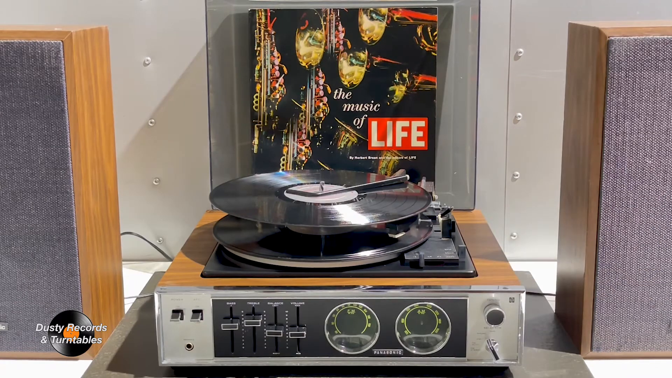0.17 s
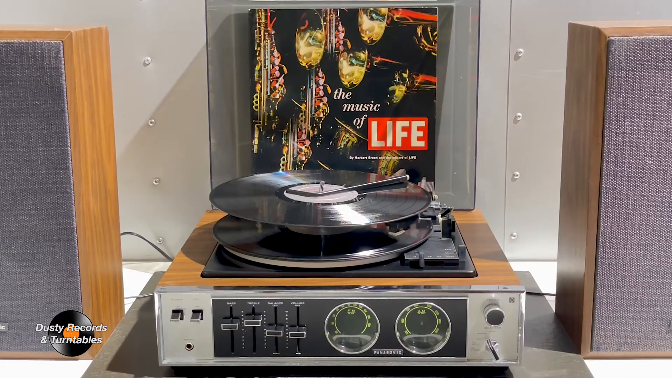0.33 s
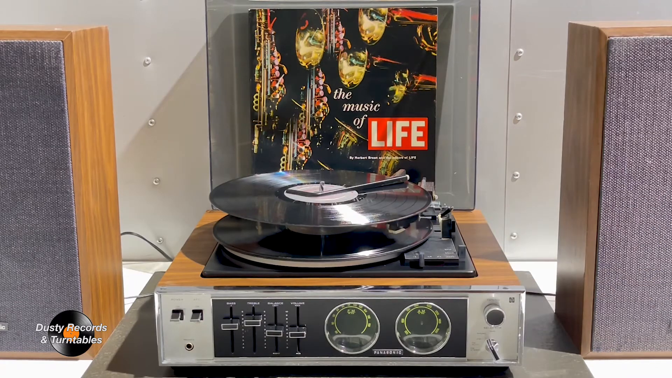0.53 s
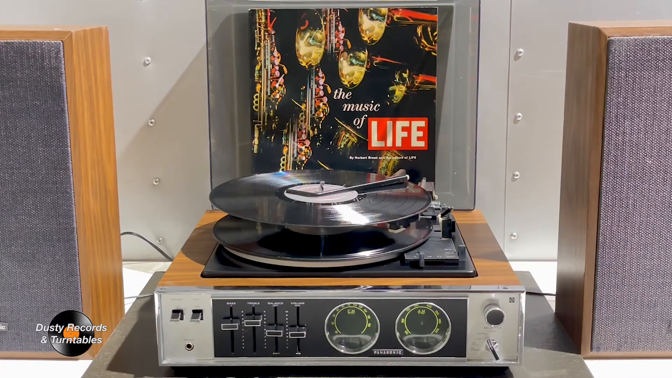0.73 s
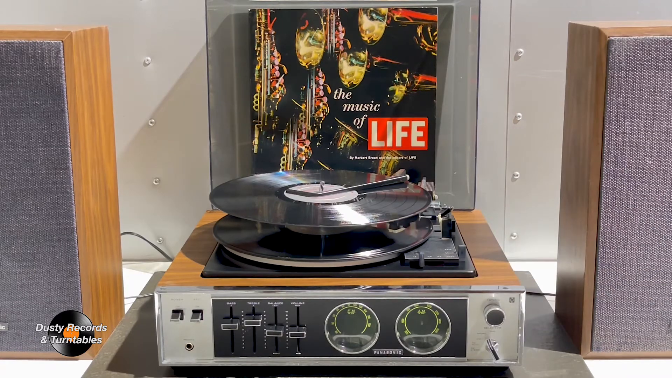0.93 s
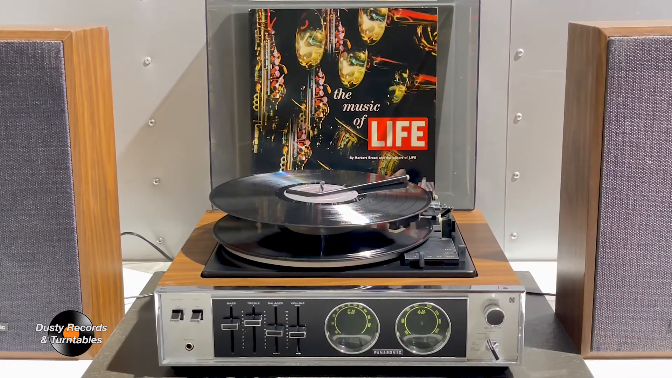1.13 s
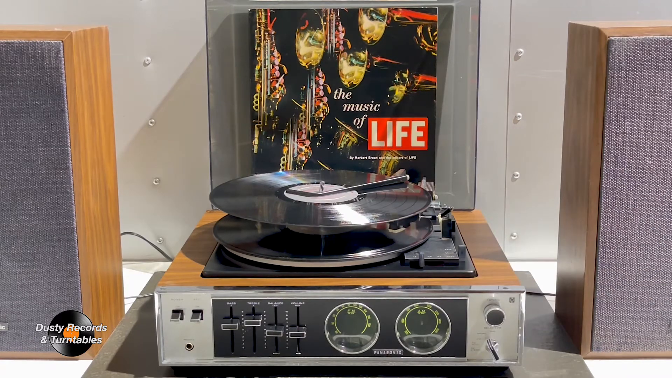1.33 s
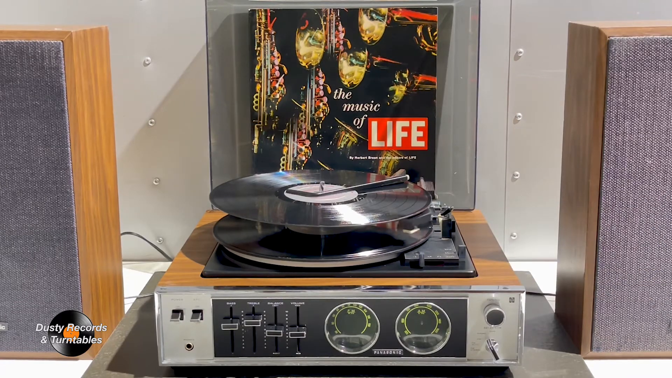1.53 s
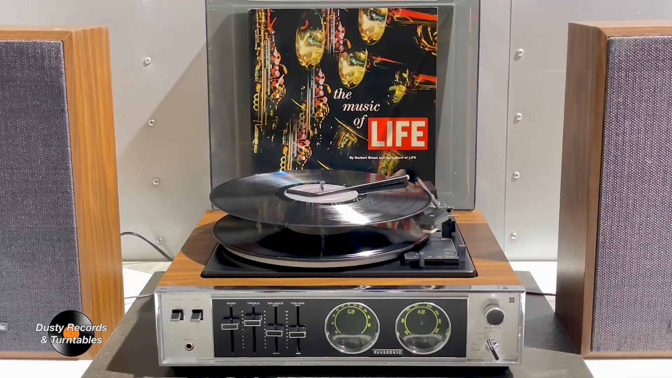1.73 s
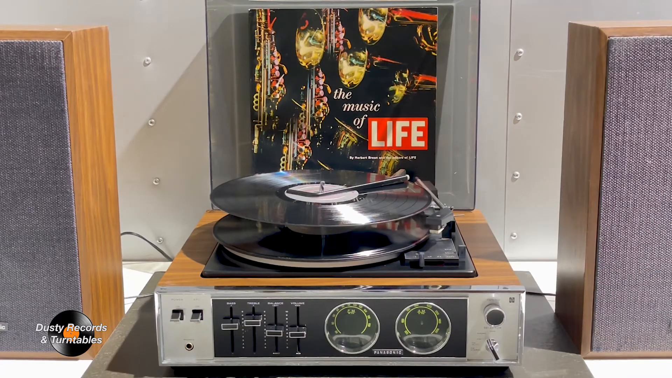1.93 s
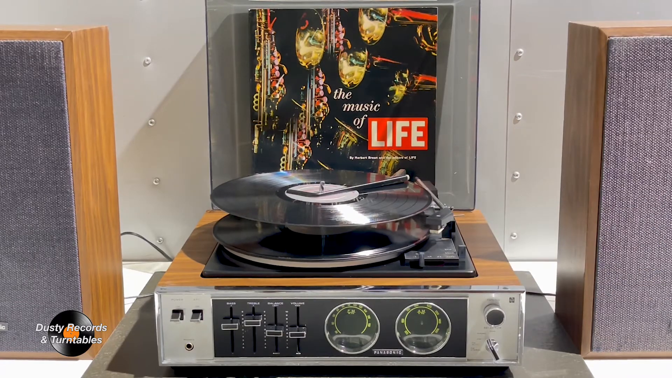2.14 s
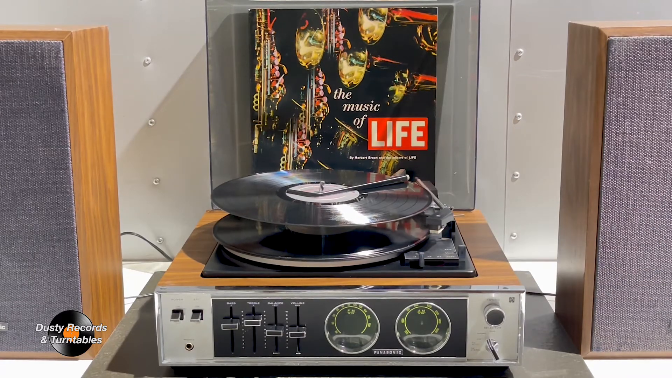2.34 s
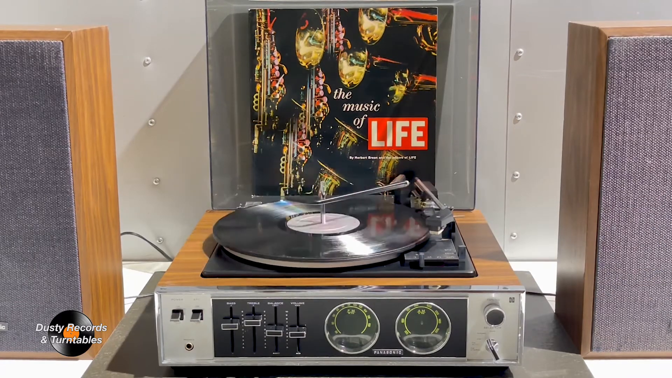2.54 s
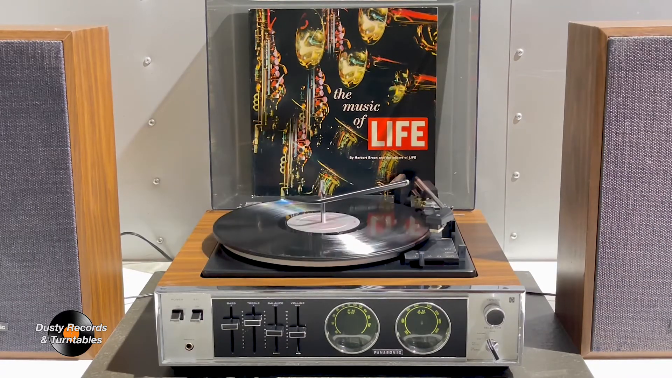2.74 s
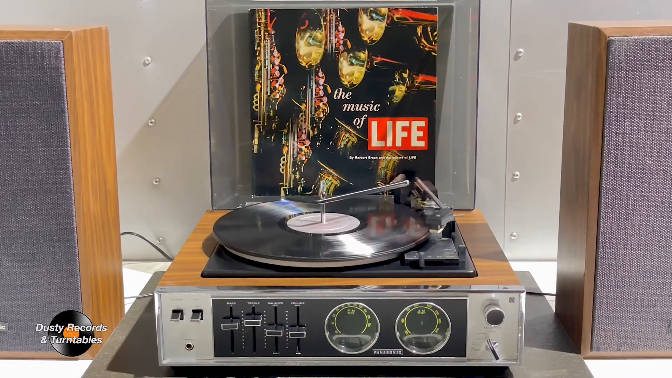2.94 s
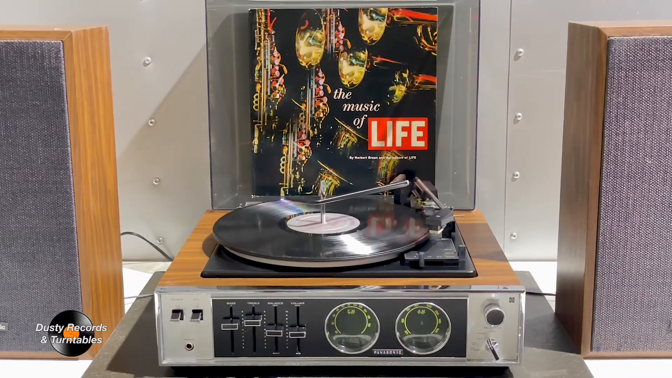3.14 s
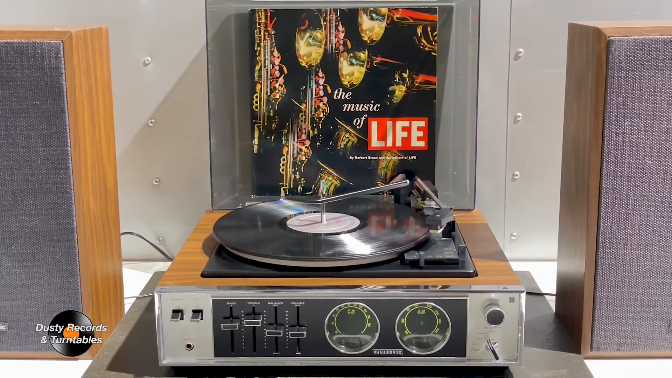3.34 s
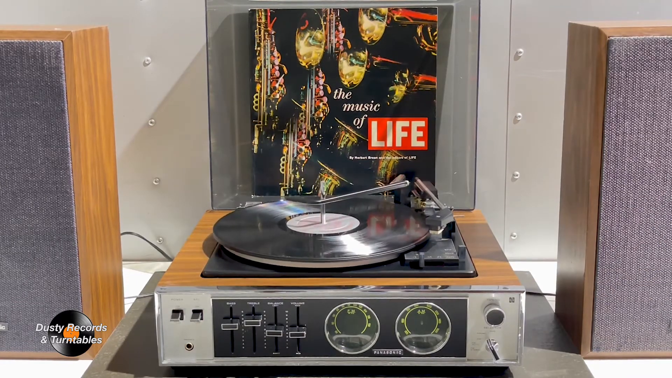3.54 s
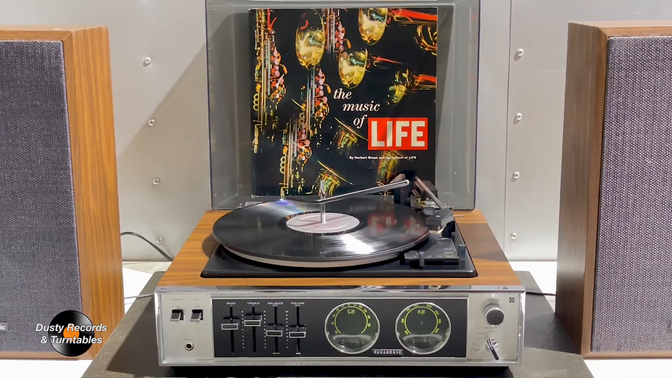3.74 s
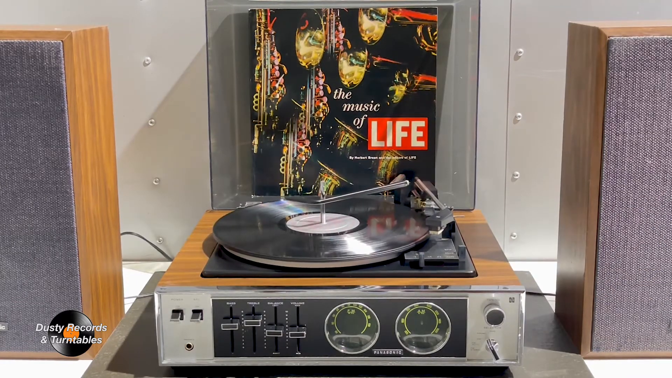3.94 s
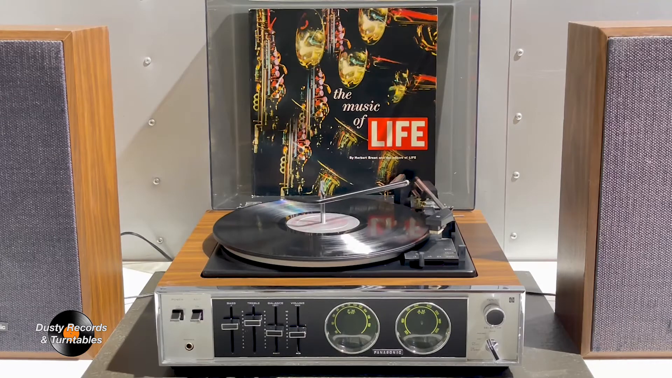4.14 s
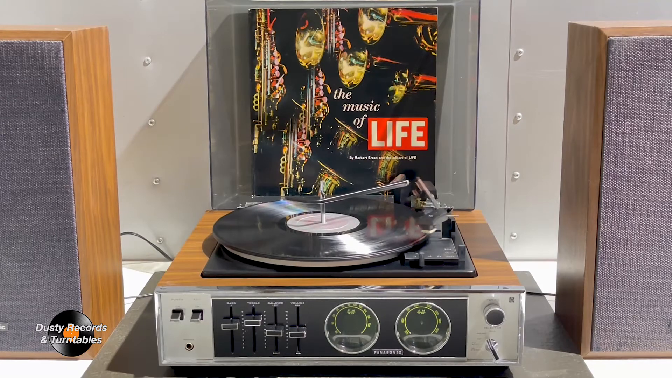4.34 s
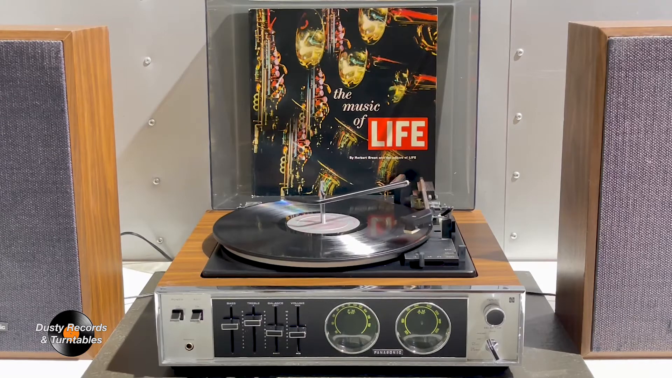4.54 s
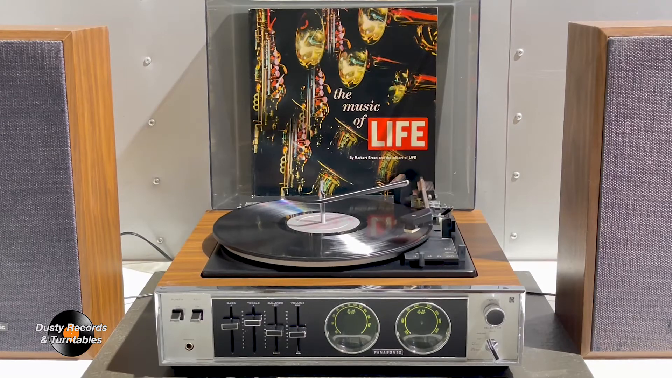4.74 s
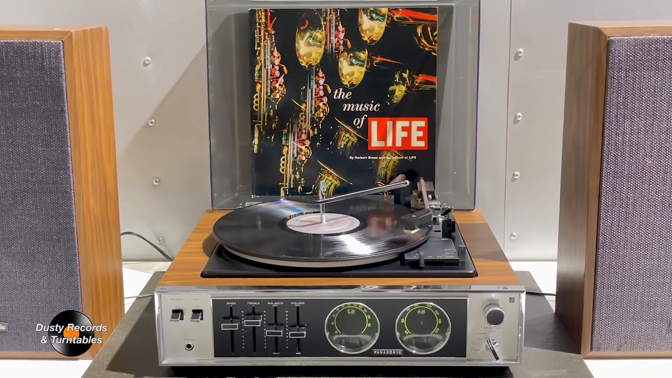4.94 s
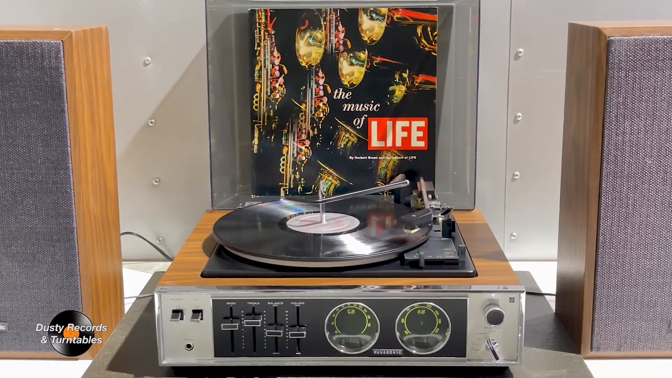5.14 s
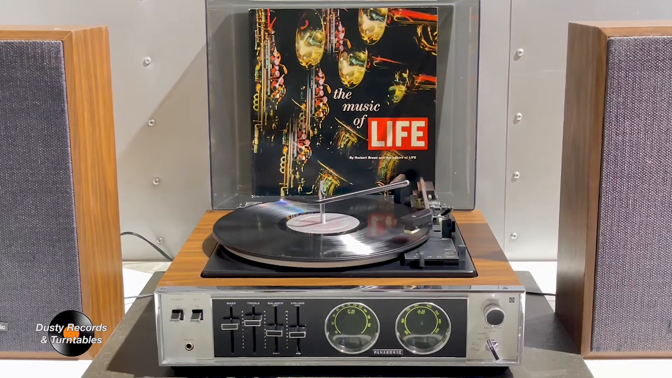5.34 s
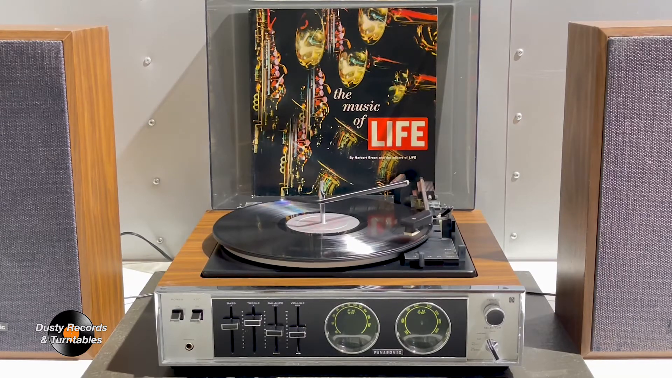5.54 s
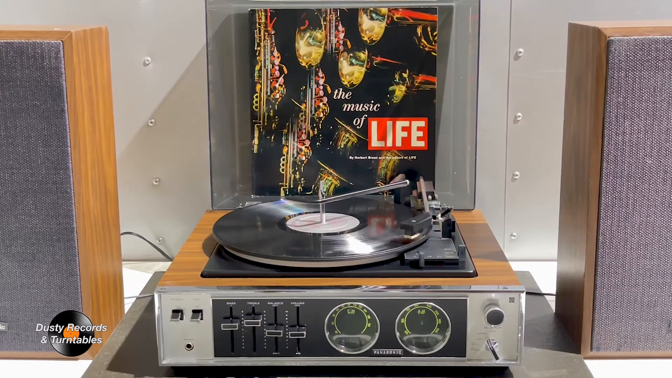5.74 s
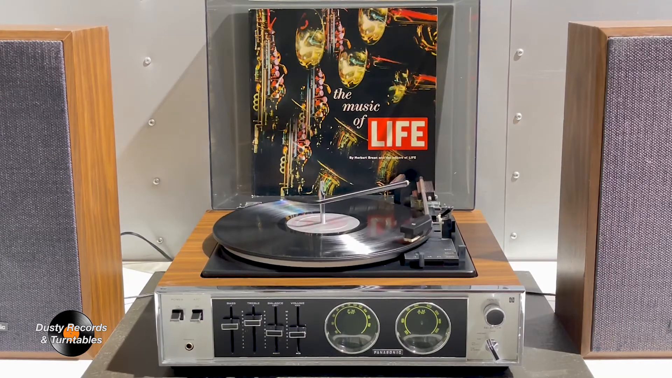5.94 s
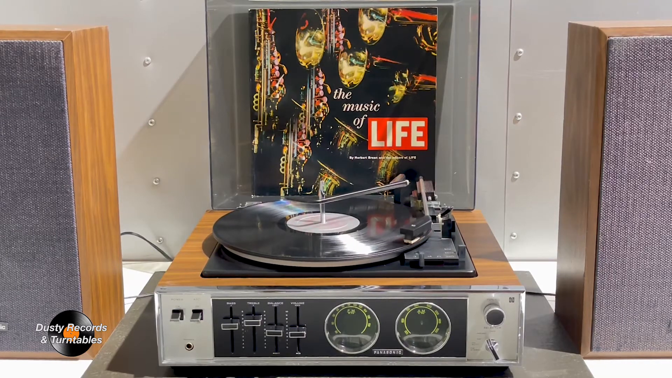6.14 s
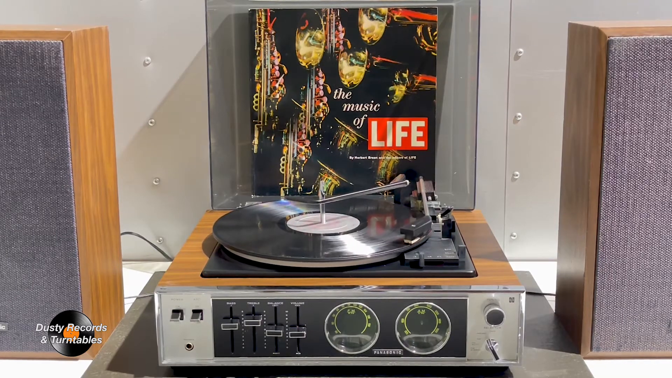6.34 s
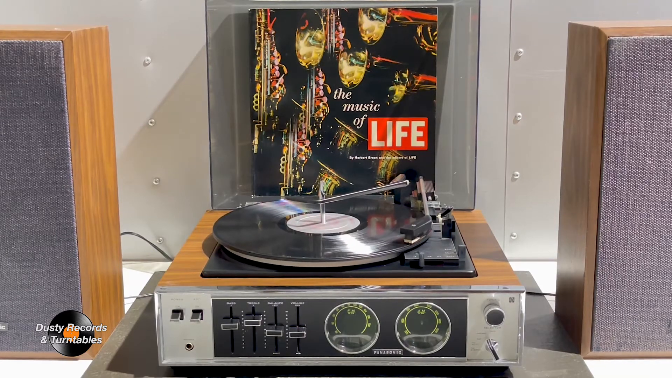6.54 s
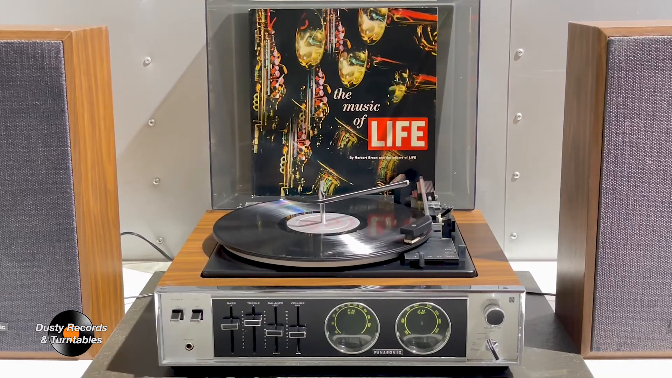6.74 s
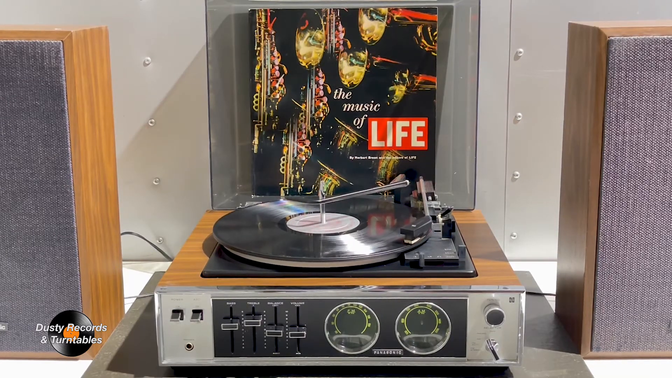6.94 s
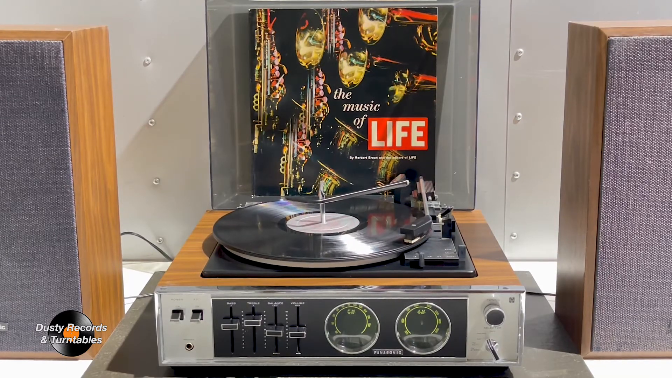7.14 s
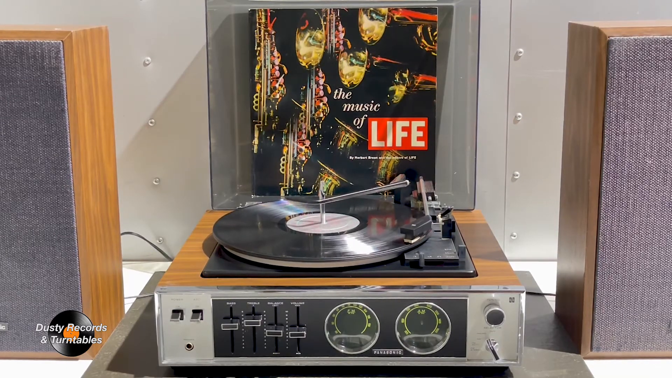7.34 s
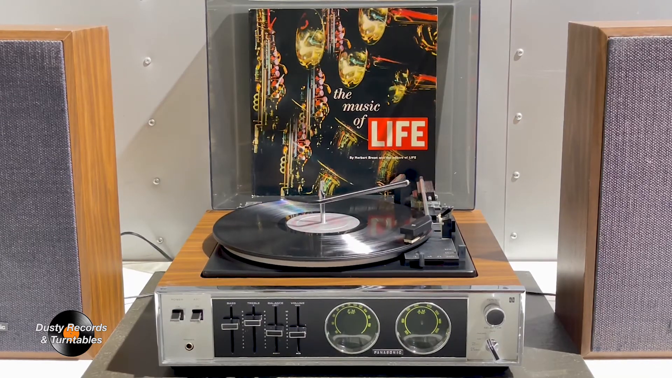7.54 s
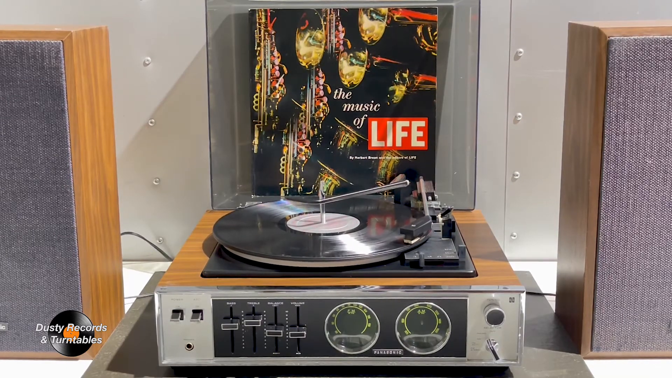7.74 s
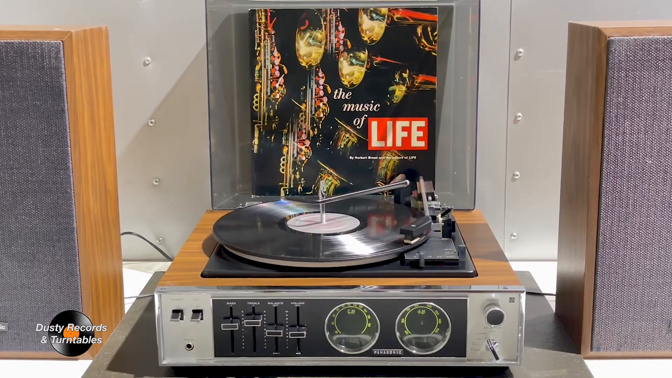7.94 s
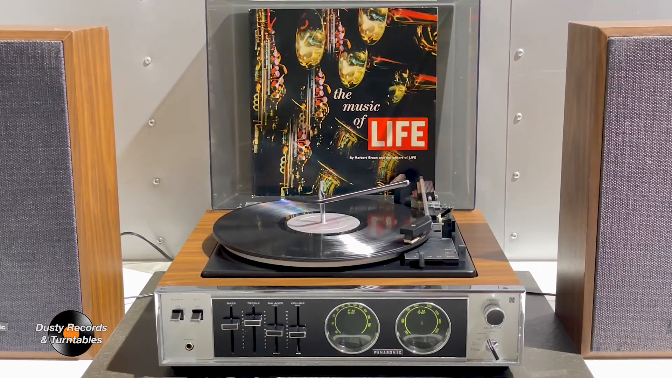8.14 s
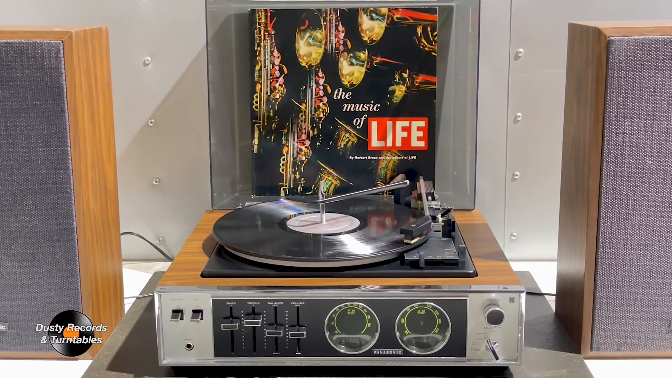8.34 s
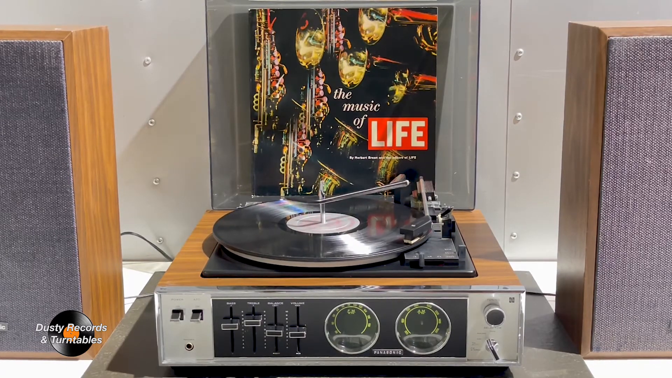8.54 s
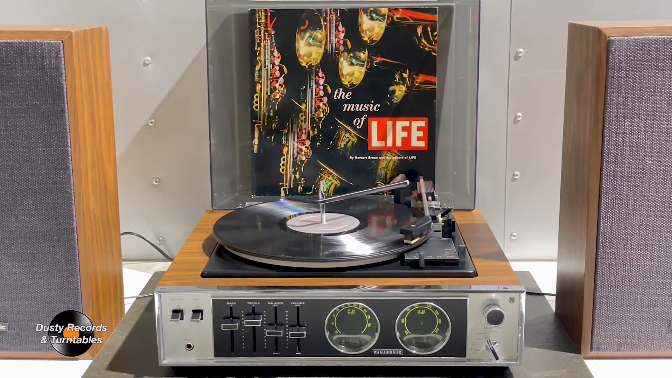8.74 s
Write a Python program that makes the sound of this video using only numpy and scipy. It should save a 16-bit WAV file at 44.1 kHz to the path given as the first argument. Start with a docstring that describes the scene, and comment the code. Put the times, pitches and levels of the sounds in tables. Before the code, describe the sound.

In a small hard room, an automatic turntable hums softly under low room tone. A faint squeak comes early, then a dense clatter of steel and wood as the disc drops at 2.5 seconds. Sparse ticks and knocks follow while the arm moves. At six seconds the stylus lands, and loudspeakers give crackle, thin hiss, rumble, pops and one big thud. Close stereo microphone, no music.

```python
"""Record changer in a small hard room

Cams and levers tick, a disc drops down the spindle and the arm swings in: noise bursts excite steel and wood modes.
Once the stylus lands, the loudspeakers play hiss, rumble and scrape of shaped noise, with crackle, pops and thuds.
A motor hum of wavering sines, the room's hush with a low draught, and a faint early squeak lie around them.
Levels in the tables are set at the source, before the room and the microphone."""
import sys
import numpy as np
from scipy import signal
from scipy.fft import rfft, irfft
from scipy.io import wavfile
from scipy.ndimage import uniform_filter1d

SR = 44100
rng = np.random.default_rng(int(sys.argv[2]) if len(sys.argv) > 2 else 0)


def volts_from_decibels(level):
    """Turn decibel levels (scalar or array-like) into linear amplitude factors."""
    exponent = np.asarray(level, float) / 20
    return 10 ** exponent


def master_out(mix):
    """Clip the mix to full scale and print it as 16-bit PCM to the path in sys.argv[1]."""
    frames = np.transpose(np.atleast_2d(mix))
    ceiling = np.clip(frames, -1, 1)
    pcm = np.round(ceiling * 32767).astype(np.int16)
    wavfile.write(sys.argv[1], SR, pcm)


N = 392490  # samples, 8.9 s
T = np.arange(N) / SR


def along(table, hz):
    """Read a (f/Hz, value) table on a log-frequency axis."""
    f, v = np.transpose(table)
    return np.interp(np.log(hz + 1), np.log(f), v)


def colour(x, table):
    """Shape by a (f/Hz, level/dB) spectrum."""
    n = x.shape[-1]
    gain = volts_from_decibels(along(table, np.fft.rfftfreq(n, 1 / SR)))
    return irfft(rfft(x) * gain, n)


def unit(x):
    """Scale to rms 1."""
    return x / np.sqrt(np.mean(x ** 2))


def peak(x):
    """Scale to peak 1."""
    return x / np.abs(x).max()


def band(x, lo_hz, hi_hz):
    """Band-pass."""
    return signal.sosfilt(signal.butter(2, [lo_hz, hi_hz], "bandpass", fs=SR, output="sos"), x)


def walk(rate):
    """Smooth random drift with rms 1, drawing a new value `rate` times a second."""
    k = int(SR / rate)
    steps = np.repeat(rng.standard_normal(N // k + 1), k)
    return unit(uniform_filter1d(uniform_filter1d(steps, k), k)[:N])


def add(track, s, sound):
    """Mix a sound in at a time in seconds."""
    i = int(s * SR)
    track[i:i + len(sound)] += sound[:N - i]


# stereo spread of the hush, nearly mono in the bass: (f/Hz, side gain over mid/dB)
HUSH_SPREAD = [(60, -21), (110, -7.5), (200, -9), (380, -7.5), (700, -1), (1290, -2), (2380, -13.5),
               (4400, -4.5), (8120, -17), (15000, 5)]


def stereo(table):
    """Noise of a given colour whose left and right agree most in the bass; its mid has rms 1."""
    mid, side = colour(rng.standard_normal((2, N)), table)
    return (mid + colour(side, HUSH_SPREAD) * np.array([[1], [-1]])) / np.std(mid)


# relative spectrum of the room tone: (f/Hz, level/dB per Hz)
HUSH_COLOUR = [(25, -14), (50, 3.5), (99, 3.5), (160, -0.5), (250, -4.5), (400, -10), (630, -17.5),
               (1000, -22), (1600, -32.5), (2500, -36), (4000, -43.5), (6300, -43), (8000, -40),
               (11500, -49), (13500, -72)]
# relative spectrum of the low draught: (f/Hz, level/dB per Hz)
DRAUGHT_COLOUR = [(20, -46.5), (40, 13), (60, 8), (85, 9), (110, -40)]
# swell of the draught: (t/s, level/dB)
DRAUGHT_SWELL = [(0, -58), (.35, -55.5), (1.2, -58.5), (1.5, -63), (1.96, -62), (2.33, -64), (2.62, -40.5),
                 (2.9, -57.5), (3.7, -64), (4.2, -64.5), (5.2, -66), (5.6, -54), (6.4, -72.5), (7, -65),
                 (7.35, -55.5), (8.9, -57.5)]
HUSH_DB = -56


def hush():
    """Room tone of steady coloured noise; a draught in the lowest octaves swells and fades."""
    swell = volts_from_decibels(np.interp(T, *np.transpose(DRAUGHT_SWELL)))
    draught = unit(colour(rng.standard_normal(N), DRAUGHT_COLOUR)) * swell
    return volts_from_decibels(HUSH_DB) * stereo(HUSH_COLOUR) + draught


# motor lines, about which the strength wavers: (f/Hz, level/dB rms)
MOTOR_LINES = [(59.2, -50.5), (118.4, -62.5), (177.6, -65), (419.9, -76.5)]


def hum():
    """Motor lines that waver in strength and phase; the cartridge picks up more of the second in the groove."""
    lift_db = 9 * np.clip((T - 6.1) / 1.5, 0, 1)
    out = np.zeros(N)
    for k, (hz, db) in enumerate(MOTOR_LINES):
        level = volts_from_decibels(db + 2.2 * walk(4.2) + lift_db * (k == 1))
        turns = hz * T + 0.017 * walk(12.0)
        out += level * np.sqrt(2) * np.sin(2 * np.pi * turns)
    return out


# reverberation time: (f/Hz, t60/s)
ROOM_T60 = [(100, 0.95), (400, 0.34), (1000, 0.71), (2500, 0.71), (5000, 0.64), (10000, 0.38)]
# spectrum of the room's tail: (f/Hz, level/dB)
TAIL_COLOUR = [(100, -2.5), (400, -2.5), (1200, -5.5), (2600, -6.5), (6000, -6), (11000, 1.5)]


def room(x, db):
    """Direct sound plus a diffuse tail of noise bands that fade at their own rates, partly shared by both sides."""
    t = np.arange(SR)[:, None] / SR
    hz = 70 * 2 ** np.arange(0, 7.5, .5)
    falls = (1000. ** (-t / along(ROOM_T60, hz))).T
    tail = np.zeros((2, SR))
    for f, fall in zip(hz, falls):
        tail += fall * band(rng.standard_normal((2, SR)), f / 2 ** .25, f * 2 ** .25)
    tail *= 1 - np.exp(-t.T / 0.0007)  # builds up over about a millisecond
    mid, side = colour(tail / np.sqrt(np.sum(tail[0] ** 2)), TAIL_COLOUR)
    side = 0.56 * band(side, 180, 11000)
    wet = np.array([mid + side, mid - side])
    return x + volts_from_decibels(db) * signal.fftconvolve(x[None], wet, axes=1)[:, :N]


# two faint squeaks, each a path of (t/s, f/Hz, level/dB rms)
SQUEAK_PATHS = [
    [(0.14, 8500, -85), (0.215, 8500, -79), (0.246, 7800, -84), (0.278, 8600, -77), (0.36, 8200, -75),
     (0.39, 8700, -82)],
    [(0.42, 7780, -80), (0.45, 8600, -79), (0.5, 8250, -76), (0.53, 7600, -95)],
]


def squeak():
    """A thin, rough tone: a sine whose pitch and strength wander about a drawn path."""
    out = np.zeros(N)
    for path in SQUEAK_PATHS:
        s, hz, db = np.transpose(path)
        turns = np.cumsum(np.interp(T, s, hz) + 90 * walk(150)) / SR
        level = volts_from_decibels(np.interp(T, s, db, left=-140, right=-140) + 1 * walk(60))
        out += level * np.sqrt(2) * np.sin(2 * np.pi * turns)
    return out


def ring(modes, size):
    """Response of (f/Hz, level/dB, t60/s) modes to one tap: sines dying exponentially."""
    t = np.arange(size) / SR
    return sum(volts_from_decibels(db) * np.sin(2 * np.pi * hz * t) * 1000. ** (-t / t60) for hz, db, t60 in modes)


def rattle(lo_hz, hi_hz, db, t60):
    """Loose parts answer a tap with too many modes to tell apart, and differently each time."""
    fall = 1000. ** (-np.arange(8192) / SR / t60)
    return volts_from_decibels(db) * unit(band(rng.standard_normal(8192), lo_hz, hi_hz)) * fall


def contact(ms):
    """Force of a short rattling contact: a quick rise, then an exponential fall with time constant ms."""
    t = np.arange(4096) / SR
    return (1 - np.exp(-t / 0.00045)) * np.exp(-t * 1000 / max(ms, 1))


def blow(ms, ringing, dbs, bands):
    """A burst of rattle heard through ringing modes and plain bands, each part at its own peak level."""
    burst = np.pad(rng.standard_normal(4096) * contact(ms), (0, 4096))
    burst[8] += 9  # the first touch is the hardest
    heard = [signal.fftconvolve(burst, response)[:8192] for response in ringing]
    heard += [band(band(burst, *edges), *edges) for edges in bands]
    return sum(volts_from_decibels(db) * peak(part) for db, part in zip(dbs, heard))


# steel chassis modes: (f/Hz, relative level/dB, t60/s)
STEEL_MODES = [(2390, -6, .02), (2520, 5, .022), (3200, 7, .018), (3400, 0, .03), (3870, -4, .02)]
# wooden plinth modes: (f/Hz, relative level/dB, t60/s)
WOOD_MODES = [(131, 3, 0.11), (216, -8, 0.116), (235.4, -3.5, 0.073), (329, 6.5, 0.066), (376, 4.5, .1),
              (472, -19, 0.12), (596, -5, 0.037)]
# loose parts: (low f/Hz, high f/Hz, level/dB against the modes, t60/s)
STEEL_RATTLE, WOOD_RATTLE = (2180, 3350, 7.1, 0.022), (155, 620, 7.1, 0.058)
# levers striking steel, peak levels: (t/s, steel ring level/dB, plinth level/dB, plate level/dB, edge level/dB)
LEVER_KNOCKS = [(1.847, -38, -30, -51, -40), (2.5253, -25.5, -25.5, -25.5, -18),
                (2.555, -31.5, -42, -35, -53), (2.578, -50, -35, -49, -56), (2.699, -46, -35, -46, -67),
                (2.859, -40, -38, -33.5, -50.5), (2.983, -50, -48.5, -39, -68.5),
                (4.49, -36, -22, -33, -47), (4.519, -41, -36, -43, -68), (4.594, -45.5, -38, -33.5, -79),
                (5.482, -52, -55, -45, -49), (5.517, -56, -55, -45.5, -60), (5.8, -42.5, -72, -49.5, -59),
                (5.961, -63, -48, -52, -75.5), (6.023, -55, -68, -51, -69)]
LEVER_CONTACT_MS = 4.5


def levers():
    """Levers ring steel and wood, with a plate band in the low mids and a bright edge on top."""
    out = np.zeros(N)
    steel, wood = ring(STEEL_MODES, size=8192), ring(WOOD_MODES, size=8192)
    for s, *dbs in LEVER_KNOCKS:
        ringing = (steel + rattle(*STEEL_RATTLE), wood + rattle(*WOOD_RATTLE))
        add(out, s, blow(LEVER_CONTACT_MS, ringing, dbs, [(380, 1170), (3600, 10200)]))
    return out


# damped slaps of the falling disc and the arm rest, peak levels:
# (t/s, clatter level/dB, plinth level/dB, plate level/dB, edge level/dB, contact time constant/ms)
DISC_AND_ARM_SLAPS = [(2.447, -47, -51, -45, -49, 11), (2.454, -35, -28, -40.5, -32.5, 18),
                      (2.467, -40.5, -30, -34.5, -57, 33), (2.487, -20.5, -28.5, -21.5, -20.5, 13.6),
                      (2.496, -26, -22.5, -20, -21, 14), (2.505, -25, -19, -31, -20, 3.8),
                      (5.502, -38, -45.5, -42.5, -34.5, 6.8), (5.673, -33, -38.5, -32.5, -20, 14),
                      (5.684, -30, -35, -42, -34, 10)]


def slaps():
    """Disc and arm rest excite only the upper wood modes, under bands of plate, clatter and edge."""
    out = np.zeros(N)
    rim = ring(WOOD_MODES[1:], size=8192)
    for s, clatter, plinth, plate, edge, ms in DISC_AND_ARM_SLAPS:
        dbs = (plinth, plate, clatter, edge)
        bands = [(400, 1640), (1600, 5500), (6000, 15300)]
        add(out, s, blow(ms, (rim + rattle(*WOOD_RATTLE),), dbs, bands))
    return out


# relative spectrum of a cam tick: (f/Hz, level/dB per Hz)
TICK_COLOUR = [(410, -54), (700, -8.5), (1430, 2), (1550, 10), (1910, -0.5), (2460, 0), (2920, -9),
               (3700, -1), (4850, -21), (5570, -21), (11000, -38), (14300, -84), (22000, -120)]
# a cam follower: (t/s, noise rms level before the contact envelope/dB, contact time constant/ms)
CAM_TICKS = [(3.6106, -37.5, 5.6), (4.2692, -41.5, 6.5), (5.2013, -40.5, 6.9)]


def cam_ticks():
    """The cam follower rings nothing: a short burst of coloured noise under a contact envelope."""
    out = np.zeros(N)
    for s, db, ms in CAM_TICKS:
        noise = unit(colour(rng.standard_normal(4096), TICK_COLOUR))
        add(out, s, volts_from_decibels(db) * noise * contact(ms))
    return out


# loudspeaker cone and box: (f/Hz, relative level/dB, t60/s)
CONE_AND_BOX = [(65, 3, 0.2), (113.6, 12, 0.21), (134.5, 11.5, 0.31), (190, -33, 0.13)]
BOX_HZ, BOX_WIDTH_HZ = 106.3, 31  # the box holds back the tones near its own


def pop_parts():
    """Four ranges of the loudspeaker's answer to a step: the lower a part, the later it leaves."""
    hz = np.fft.rfftfreq(16384, 1 / SR) + 1
    glide = 1.197 * np.log((hz + 20) / (hz + 3000)) + hz * 0.000464
    box_lag = np.arctan((hz - BOX_HZ) / BOX_WIDTH_HZ) / np.pi - .5
    sweep = -np.exp(-2j * np.pi * (glide + box_lag))
    parts = []
    for centre_hz, octaves in [(2800, .55), (118, 1.1), (480, 1.15), (6300, .75)]:
        bell = np.exp(-np.log2(hz / centre_hz) ** 2 / octaves ** 2)
        parts.append(peak(irfft(sweep * bell)))
    bite, thump, knock, tick = parts
    box = ring(CONE_AND_BOX, size=16384) * (1 - np.exp(-np.arange(16384) / SR / 0.01))
    return bite, thump + volts_from_decibels(-16.0) * peak(box), knock, tick


# dust and scratches under the stylus:
# (t/s, bite 2-4 kHz level/dB, knock 300-1300 Hz level/dB, tick 5-10 kHz level/dB)
DUST_POPS = [(6.0786, -45, -34.5, -50), (6.0998, -27, -21.5, -61), (6.1174, -33, -42, -57),
             (6.1368, -37, -60, -46), (6.16, -41, -49, -43), (6.1706, -39, -45, -55),
             (6.1958, -38, -41, -31), (6.2279, -45, -43, -57), (6.2621, -35, -39, -43.5),
             (6.3306, -35, -47, -53), (6.337, -34, -48, -44), (6.3547, -37, -44, -38),
             (6.4007, -37.5, -50, -54), (6.4117, -38.5, -38, -37.5), (6.4816, -47, -45, -52),
             (6.523, -41, -44, -61), (6.6877, -33, -42.5, -44), (6.803, -35, -48, -60),
             (7.0626, -17.5, -26, -19), (7.1123, -36, -43, -62), (7.1754, -39, -50, -62),
             (7.2121, -30, -9.5, -44), (7.4498, -29, -40.5, -26.5), (7.7418, -41.5, -58, -41),
             (8.0923, -20.5, -32.5, -18.5), (8.3157, -48.5, -38, -49), (8.4035, -49, -60, -41),
             (8.423, -51, -61, -35.5), (8.4434, -64, -57, -46), (8.4598, -27.5, -42, -25.5),
             (8.466, -36, -55, -35), (8.5444, -39, -52, -31.5), (8.6215, -40.5, -55, -38.5),
             (8.8346, -34.5, -60, -33)]
# jolts that throw the cone: (t/s, level/dB, pitch ratio)
CONE_THUDS = [(6.0996, -27, 0.63), (6.4092, -35, 0.85), (6.6869, -37.5, 1.94), (7.2116, -10.5, 0.89)]
LANDS_S = 6.066  # the stylus meets the record
CRACKLE_PER_S, CRACKLE_DB, CRACKLE_THINS_S = 50, -44, .3  # small pops, densest on the dusty rim


def pops():
    """Single pops and thuds, and a random crackle that thins out after the landing."""
    out = np.zeros(N)
    bite, thump, knock, tick = pop_parts()
    for s, *dbs in DUST_POPS:
        add(out, s, sum(volts_from_decibels(db) * part for db, part in zip(dbs, (bite, knock, tick))))
    for s, db, ratio in CONE_THUDS:
        repitched = np.interp(np.arange(8192) * ratio, np.arange(len(thump)), thump)
        add(out, s, volts_from_decibels(db) * repitched)
    when, size = rng.random(N), volts_from_decibels(CRACKLE_DB + 2.5 * rng.standard_normal(N))
    rate = CRACKLE_PER_S * np.exp(-np.maximum(T - LANDS_S, 0) / CRACKLE_THINS_S) * (T > LANDS_S)
    small_pop = bite + volts_from_decibels(-12) * knock + volts_from_decibels(-22) * tick
    return out + signal.fftconvolve((when < rate / SR) * size, small_pop)[:N]


# groove hiss: (t/s, level/dB)
HISS_LEVEL = [(6.085, -58), (6.17, -61.5), (6.45, -59), (6.6, -65), (6.81, -58), (6.87, -73), (6.95, -59.5),
              (7.03, -64), (7.2, -60.5), (7.3, -70.5), (7.38, -60.5), (7.44, -69), (7.75, -66),
              (7.82, -60.5), (7.92, -71.5), (8.13, -64.5), (8.75, -66.5), (8.84, -59), (8.9, -60.5)]
# relative spectrum of the hiss: (f/Hz, level/dB per Hz)
HISS_COLOUR = [(760, 1), (1300, -3), (1690, -33), (2170, 1.5), (3410, -3.5), (4820, -12), (6190, -5),
               (7510, -22.5), (9100, -9), (9740, -15), (10300, -56), (11600, -22), (13000, -53)]
# cabinet resonances: (f/Hz, width f/Hz, relative level/dB)
CABINET = [(103.5, 53, 3.5), (207.7, 32.3, 3.5), (205, 14, -12.5), (362.4, 13.3, -7)]
# bumps of the groove wall: (t/s, length t/s, rumble level/dB, scrape level/dB)
GROOVE_BUMPS = [(6.111, 0.053, -42.5, -45.5), (6.419, .04, -42, -55), (6.716, 0.062, -34.5, -51),
                (6.789, 0.089, -43.5, -61), (6.946, 0.022, -60, -53), (7.104, 0.21, -58.5, -63),
                (7.274, 0.027, -46, -70), (7.828, 0.14, -50, -83), (8.835, 0.075, -54, -57)]
# steady rumble, fuller once the stylus has dropped in; its flicker is an rms spread
RUMBLE_DB, RUMBLE_GROWS_DB, RUMBLE_GROWS_S, RUMBLE_FLICKER_DB = -56.5, 10, 7.2, 3.5
SCRAPE_DB, SCRAPE_FADES_DB_PER_S = -59.5, 6


def stylus():
    """Pops, fine crackle, hiss, rumble and scrape, as the loudspeakers give them."""
    down = np.clip((T - LANDS_S) / 0.016, 0, 1)
    hiss_level = volts_from_decibels(np.interp(T, *np.transpose(HISS_LEVEL)))
    growth_db = RUMBLE_GROWS_DB / (1 + np.exp(-(T - RUMBLE_GROWS_S) / .1))
    rumble_level = volts_from_decibels(RUMBLE_DB + growth_db + RUMBLE_FLICKER_DB * walk(9))
    scrape_level = volts_from_decibels(SCRAPE_DB - SCRAPE_FADES_DB_PER_S * (T - LANDS_S))
    for s, length, rumble_db, scrape_db in GROOVE_BUMPS:
        hump = np.exp(-(2 * (T - s) / length) ** 2)
        rumble_level = rumble_level + volts_from_decibels(rumble_db) * hump
        scrape_level = scrape_level + volts_from_decibels(scrape_db) * hump
    # about 300 grains a second, many tiny and a few larger
    chance = rng.random((3, N))
    dust = (chance[0] < 300 / SR) * np.sign(chance[1] - .5) * volts_from_decibels(-2.5 * np.log(chance[2]))
    flickering = rng.standard_normal(N) * volts_from_decibels(0.8 * walk(25))
    hiss = unit(colour(flickering + volts_from_decibels(18.5) * dust, HISS_COLOUR))
    noise = rng.standard_normal(N)
    rumble = unit(sum(volts_from_decibels(db) * band(noise, f - w / 2, f + w / 2) for f, w, db in CABINET))
    scrape = unit(band(rng.standard_normal(N), 166, 910)) * volts_from_decibels(2.6 * walk(34))
    return pops() + down * (hiss_level * hiss + rumble_level * rumble + scrape_level * scrape)


def scene():
    """Deck in the middle, loudspeakers either side, the right a little louder; hum and hush stay dry."""
    deck = room(levers() + slaps() + cam_ticks(), -6)
    loudspeakers = room(stylus(), -11.5) * volts_from_decibels([[-.6], [.6]])
    return deck + loudspeakers + room(squeak(), -8.5) + hum() + hush()


def band_limit(x):
    """A steep low-pass at the top of the band."""
    return signal.sosfilt(signal.butter(12, 16800, fs=SR, output="sos"), x)


# two dips and one peak of the microphone housing: (f/Hz, half-width f/Hz, level/dB)
HOUSING = [(4700, 730, -5.5), (10450, 220, -22), (10960, 890, 5.5)]
# phase between the two ports: (f/Hz, lead of the left/rad)
PORT_LEAD = [(0, 0), (8550, 0), (9000, -1.5), (9650, -2.4), (11800, -5.6), (15000, -12.5)]
TOP_HZ = 11470  # the treble falls away above this


def record(dry):
    """The housing dips two narrow bands, lifts one and loses both ends; treble reaches the ports out of step."""
    hz = np.fft.rfftfreq(N, 1 / SR)
    housing_db = sum(db * np.exp(-((hz - f) / w) ** 2) for f, w, db in HOUSING)
    ends_db = -24 * np.clip((hz - TOP_HZ) / 2500, 0, 1) - 12 * np.exp(-(hz / 40) ** 2)
    lead = np.interp(hz, *np.transpose(PORT_LEAD)) * np.array([[.5], [-.5]])
    mix = irfft(rfft(dry) * volts_from_decibels(housing_db + ends_db) * np.exp(1j * lead), N)
    return band_limit(mix)


dry = scene()
out = record(dry)
master_out(out)
```